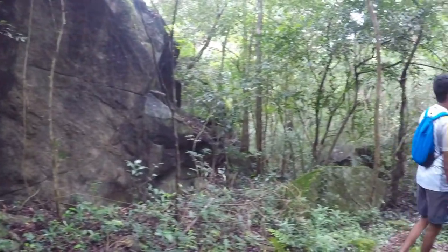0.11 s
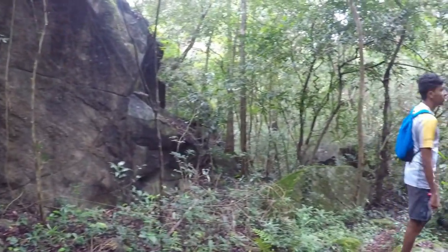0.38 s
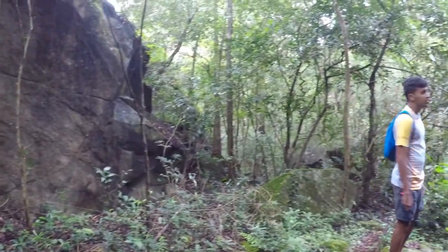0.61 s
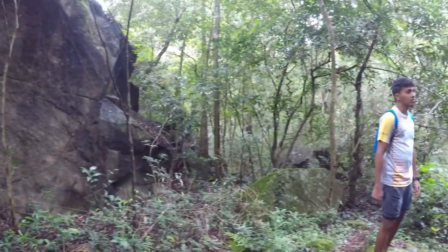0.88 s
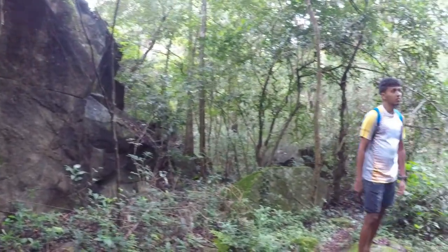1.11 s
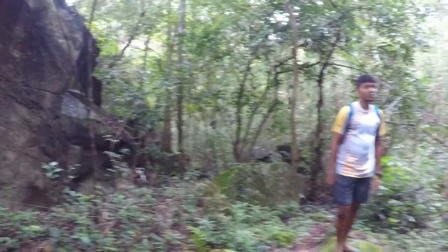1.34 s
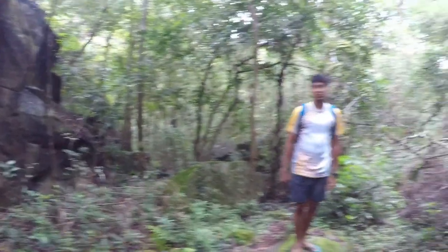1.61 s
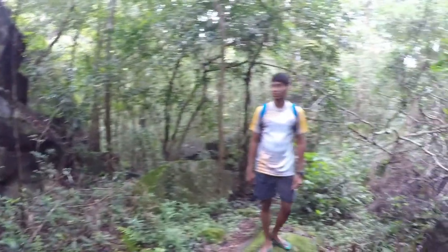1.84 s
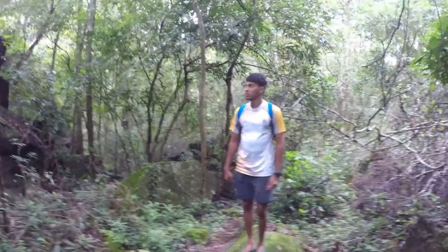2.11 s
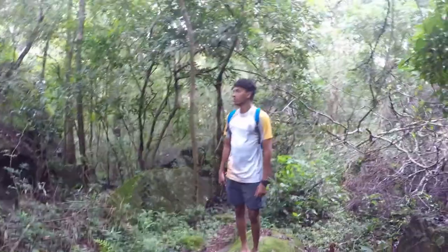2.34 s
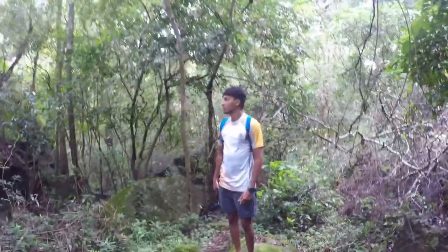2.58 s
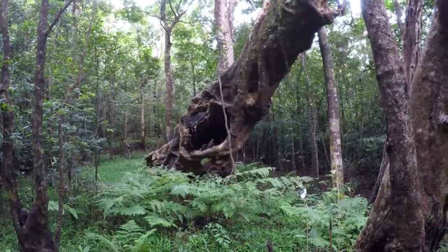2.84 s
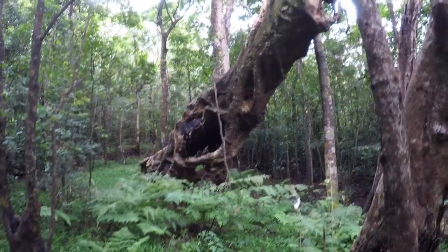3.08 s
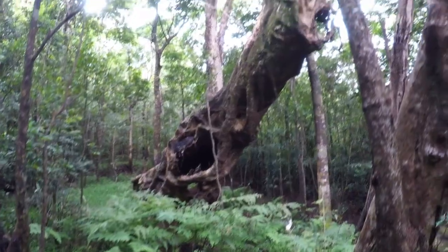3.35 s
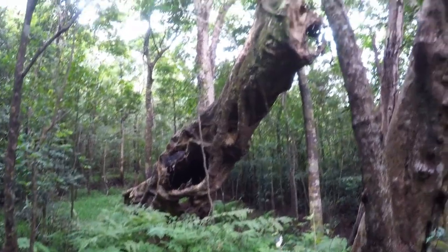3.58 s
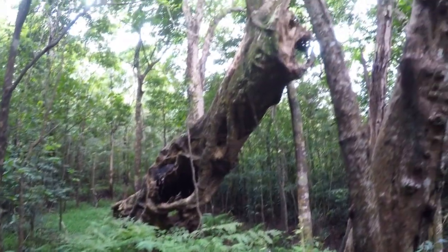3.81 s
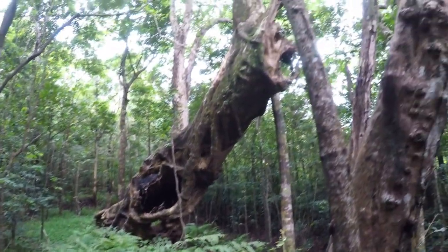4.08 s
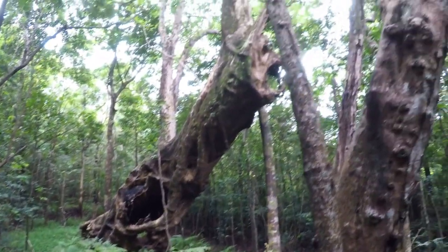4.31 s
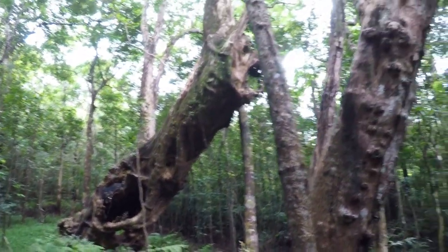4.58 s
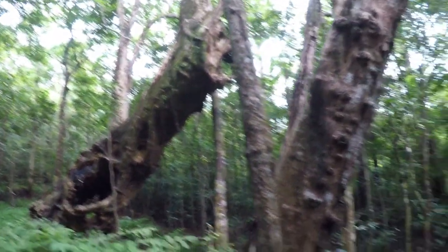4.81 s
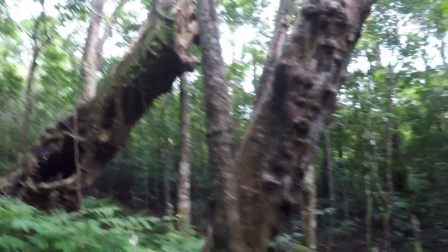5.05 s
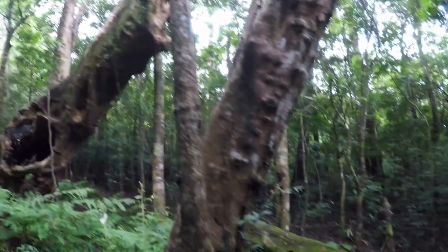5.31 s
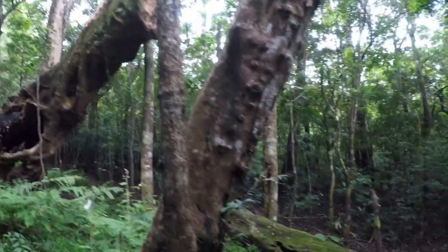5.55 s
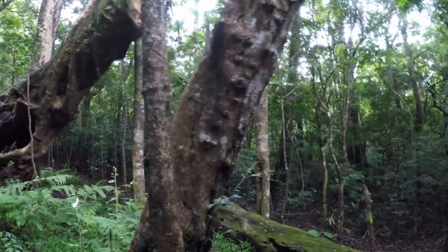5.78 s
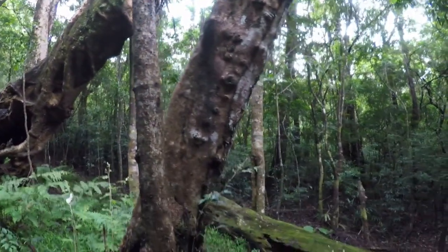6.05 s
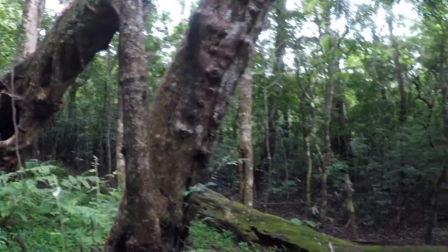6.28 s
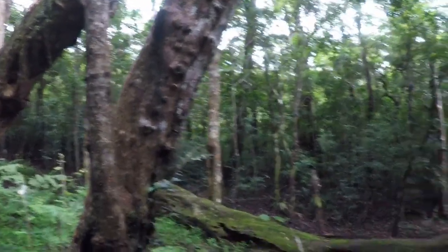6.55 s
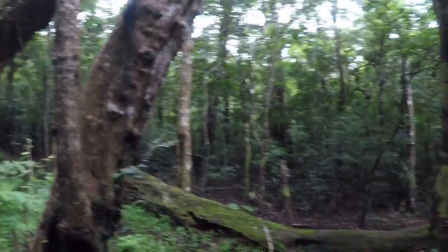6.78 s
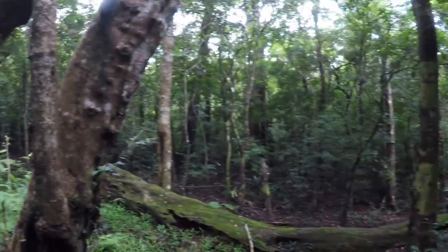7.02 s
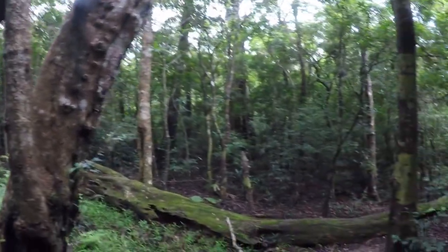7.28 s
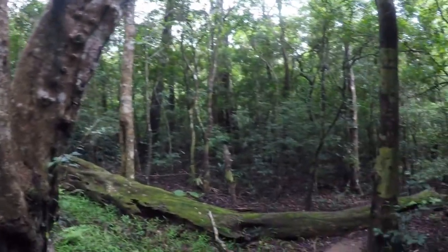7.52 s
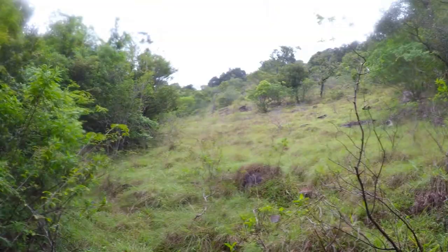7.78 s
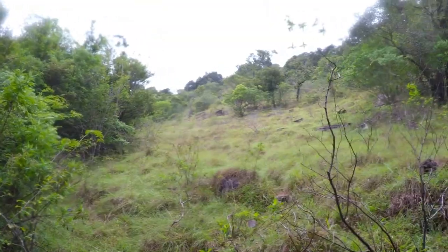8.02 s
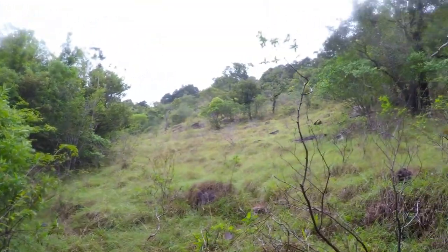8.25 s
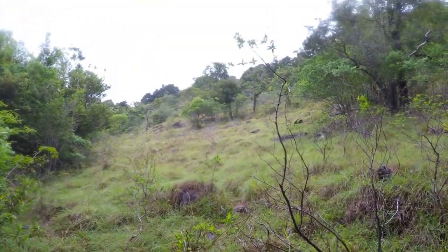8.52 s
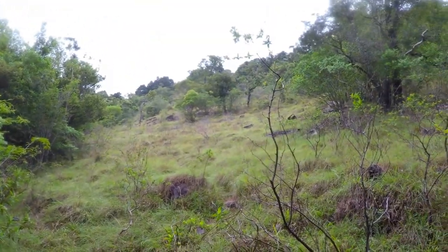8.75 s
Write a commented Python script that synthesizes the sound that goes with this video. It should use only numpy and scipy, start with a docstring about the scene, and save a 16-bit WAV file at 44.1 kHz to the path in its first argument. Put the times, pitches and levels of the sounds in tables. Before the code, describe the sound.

A hand-held camera on a forest walk: steady low rumble, leaf hiss and faint high insects, with a burst of heavy thumps and knocks from steps. A sudden cut brings near quiet, soft foliage and small gliding bird whistles echoing among trunks, then a cluster of bumps and scuffs. A last cut brings a low puff of wind and rattling knocks. Wide at first, nearly mono after cuts.

```python
"""Forest walk with a small camera

Three shots of a forest walk are cut together. Breeze and steps shake a hand-held camera's housing: filtered noise
rumbles near 160 Hz, and jolts and scuffs ring its resonances as thumps and knocks. Leaves, insects and short hissy
patches are shaped noise; far birds are gliding near-sines with echoes off the trunks.
The camera blends between two microphone ports (wide) and a single one (mono)."""
import sys
import numpy as np
from scipy import signal
from scipy.fft import rfft, irfft
from scipy.io import wavfile

SR = 44100
rng = np.random.default_rng(int(sys.argv[2]) if len(sys.argv) > 2 else 0)


def wav_out(sig):
    """Save sig, one row per channel (or a flat mono array), as 16-bit PCM at SR to the path in sys.argv[1]."""
    wavfile.write(sys.argv[1], SR, np.round(np.clip(np.atleast_2d(sig).T, -1, 1) * 32767).astype(np.int16))


def volts(x):
    """Linear amplitude factor 10**(x/20) for a level x in dB, scalar or array-like."""
    e = np.asarray(x, float) / 20
    return 10 ** e


N = 391608

# Moments where one shot cuts to the next, in seconds.
CUT_TIMES = [2.631, 7.801]

# Air pushing on the ports. Each row: frequency in Hz, relative level in dB per Hz.
WIND_COLOUR = [(15, -7), (40, 6.5), (100, 2.5), (160, -10), (300, -13)]
# Shaking of the housing, one list per shot. Each row: frequency in Hz, relative level in dB per Hz.
RUMBLE_COLOURS = [
    [(95, -54), (110, -20), (145, -1), (170, 0.5), (280, -14), (600, -44)],
    [(95, -44), (115, -28), (145, 1), (180, -2.5), (300, -13), (600, -40)],
    [(80, -9), (150, 3), (250, 2.5), (400, -15.5), (600, -24)],
]
# Hiss of the leaves, one list per shot. Each row: frequency in Hz, relative level in dB per Hz.
LEAF_COLOURS = [
    [(210, -46), (350, -9), (650, -11.5), (1550, -9), (2100, -13), (3660, -14), (4090, -17.5), (5360, -23),
     (7710, -26.5), (15500, -53)],
    [(210, -36), (350, -4.5), (1030, -12.5), (1130, -11.5), (2070, -14), (2350, -16.5), (9630, -26),
     (15500, -38)],
    [(210, -38), (350, 2), (619, -8.5), (2170, -14), (3030, -22), (4290, -19), (10100, -22), (15500, -47)],
]
# Swells, one list per shot. Each row: time in seconds, wind on the port in dB, housing rumble in dB,
# body of the leaf hiss in dB.
BREEZE_SWELLS = [
    [(0, -40, -31.5, -52.5), (1.41, -55, -29, -51.5), (2.14, -43.5, -30.5, -50.5), (2.628, -44, -28, -42)],
    [(2.636, -45, -49.5, -55), (3.93, -59, -48.5, -54.5), (6.11, -77, -48.5, -57), (6.59, -65, -38, -54.5),
     (6.83, -76, -49, -58), (7.797, -75, -44, -53)],
    [(7.806, -34, -55, -54), (8.068, -38.5, -38, -47), (8.88, -51, -43, -50)],
]
# How far apart the two ports hear noise. Each row: frequency in Hz, side over mid in dB before the port blend.
PORT_DIFFERENCE = [(60, -22), (140, -22), (290, -7.5), (640, 7), (1400, 2), (2500, 0.5), (3600, -8.5),
                   (5200, -0.5), (15000, -1)]

# Starting point for the treble of the hiss: one level in dB per shot.
TREBLE_LEVELS = [-53, -64, -59.5]
TREBLE_FOLLOWS = 0.65   # share of the leaf body's swing in dB
DULL_DB, BRIGHTEN_S = -21, 0.23   # after a cut the treble is heard this far down, then returns (time constant)

CHORUS_DB = -57   # insects near 5.2 kHz, middle level
# Short hissy patches, narrow or broad: some insects, brushed leaves, scuffs and hisses of unknown source.
# Each row: start in seconds, length in seconds, centre in Hz, width in Hz, level in dB.
HISSY_PATCHES = [(.26, 0.085, 7550, 400, -58), (0.91, 0.19, 5130, 600, -52),
                 (1.235, 0.062, 7660, 400, -52.5), (2.182, 0.13, 1990, 795, -45),
                 (2.236, 0.081, 7600, 400, -51), (2.417, 0.81, 2000, 780, -40),
                 (2.76, 0.24, 3570, 1600, -56.5), (3.36, 0.09, 5370, 300, -64),
                 (4.37, 0.045, 5500, 2000, -61), (8.292, 0.018, 4800, 1200, -38),
                 (8.407, .08, 5450, 900, -58)]

# Gliding bird whistles. Each row: start in seconds, length in seconds, first pitch in Hz, last pitch in Hz,
# base level in dB.
BIRD_WHISTLES = [(0.988, 0.24, 3860, 3296, -56.5), (3.255, .07, 2085, 1870, -61),
                 (3.657, 0.048, 2550, 2130, -57), (3.708, 0.12, 2050, 1270, -46),
                 (4.058, 0.23, 1700, 1770, -69), (4.209, 0.066, 1850, 2020, -65),
                 (4.304, 0.098, 1850, 1515, -61.5), (4.778, .09, 1207, 1053, -64),
                 (4.828, .28, 2580, 1963, -58), (5.08, .17, 5630, 4300, -66), (5.27, .2, 3920, 2920, -66.5),
                 (6.185, .1, 1880, 1890, -61.5), (6.292, 0.1, 1210, 1037, -59),
                 (6.512, 0.139, 1250, 1325, -51), (7.165, 0.098, 1875, 1595, -56),
                 (7.617, 0.079, 3270, 3680, -65), (7.653, 0.046, 1874, 1960, -53.5),
                 (7.658, 0.064, 2790, 2930, -53)]
GLIDE_EASE = 1.5   # over 1: the glide is fast at first and settles on the last pitch
LOUDER_DB_PER_OCTAVE = 10   # gain as a whistle sinks in pitch
# Arched bird calls. Each row: start in seconds, length in seconds, top pitch in Hz, base level in dB.
BIRD_HOOTS = [(3.613, .2, 1506, -51), (4.898, 0.22, 1479, -52)]
HOOT_START, HOOT_END = 0.85, 0.83   # pitch as a share of the top pitch
HOOT_TOP_AT, HOOT_LOW_AT = 0.218, 0.62   # moments as shares of the call's length
CALL_ATTACK_S, CALL_HOLD, CALL_FADE_DB = 0.0072, 0.59, -8   # hold as share of the length; fade by the end
FOREST_T60_S, FOREST_DB = 0.86, 0   # time for the echoes to fall 60 dB; their level against the call

# Jolts of the camera. Each row: time in seconds, then the relative strengths in dB of knock, thump,
# hollow part and crack.
CAMERA_JOLTS = [(1.3741, -24.5, -5.5, -20.5, -29), (1.4607, -27.5, -27, -23, -38),
                (1.4729, -37, -14, -18.5, -38), (1.4835, -33, -17, -35, -39),
                (1.5658, -24.5, -4.5, -7.5, -23.5), (1.5705, -29, -8.5, -36, -46),
                (1.644, -23, -7, -14.5, -26), (1.669, -17, 0, -10, -14.5), (2.5712, -28, -1, -16.5, -25),
                (2.5973, -46, 1.5, -46, -40), (3.6236, -41.5, -23.5, -33, -31),
                (5.2033, -47.5, -60, -51, -40), (5.3309, -52, -25, -37.5, -39),
                (6.0623, -50, -21, -29.5, -69), (6.095, -37.5, -9.5, -20.5, -50),
                (6.2732, -57, -21, -37, -72), (6.371, -28, -7.5, -14, -34), (6.395, -31.5, -11, -31, -32),
                (6.408, -22.5, -27, -34, -28), (6.4146, -20, -3, -10, -13.5), (6.4348, -33, -6.5, -23, -48),
                (6.4541, -29, -7, -11, -21), (6.4616, -22.5, -3.5, -34, -17.5),
                (6.4817, -33.5, -19, -40, -39), (6.5156, -46, -15.5, -19, -37),
                (6.692, -27.5, -20.5, -48, -26.5), (6.761, -31, -11, -14, -33),
                (7.236, -39, -13.5, -53, -60), (7.8202, -47, -21, -33, -65), (7.868, -42, -16, -24, -61),
                (7.939, -57, -26, -26, -34), (7.9757, -36, -15.5, -17, -25.5), (7.9913, -30, -11, -19, -36),
                (8.143, -51, -23, -31, -50), (8.189, -51, -10, -21.5, -45), (8.2352, -45, -23, -28, -44),
                (8.278, -55, -35, -27, -45), (8.2887, -55, -27, -13.5, -40), (8.3003, -22, -12, 0, -21),
                (8.3061, -48, -35, -11, -40), (8.4282, -35, -14, -20, -33)]
CONTACT_S, CONTACT_SPREAD_DB = 0.0035, 2.5   # time scale of a jolt's chatter, and how much that varies
# Hand and strap scuffing the housing. Each row: start in seconds, length in seconds, relative strength in dB.
HOUSING_SCUFFS = [(2.183, 0.083, -49.5), (2.41, 0.26, -58), (6.444, 0.062, -37), (6.482, 0.081, -42.5),
                  (6.582, 0.028, -40), (6.545, 0.09, -50), (6.685, 0.031, -41), (6.756, 0.06, -37.5),
                  (7.226, 0.038, -45.5), (7.4, 0.059, -55), (7.784, 0.016, -33.5), (7.852, 0.027, -48),
                  (7.925, 0.093, -48.5), (8.133, 0.056, -49.5), (8.26, 0.019, -64), (8.405, 0.12, -47.5)]
# Resonances of the housing, in lists for thump, hollow part, knock and crack. Each row: frequency in Hz,
# relative level in dB, time to fall 60 dB in seconds.
HOUSING_MODES = [
    [(165.3, 2.5, 0.069), (210, -2, 0.032), (290, -31, 0.026)],
    [(426, 6.5, 0.0067), (671, -26.5, 0.14), (820, -6, 0.029)],
    [(1215, 4.5, 0.013), (1664, -6, 0.025), (1960, 7, 0.0072), (2143, -6, 0.012), (2585, -7.5, 0.008),
     (3080, -11.5, 0.02)],
    [(3880, -2.5, 0.0032), (5500, -3.5, 0.003), (6930, -15, 0.012), (8840, -17.5, 0.0034)],
]
# A yielding contact passes little higher pitch: one limit in Hz for each of those four parts.
CONTACT_LIMITS = [900, 1500, 4300, 13000]
# Difference between the ports through the shell. Each row: frequency in Hz, relative side level in dB.
SHELL_DIFFERENCE = [(130, -29), (240, -4), (460, 7), (720, 12.5), (1400, 6), (2400, -1), (3400, 5),
                    (7000, -3)]
# Low cut on the jolts and scuffs: one frequency in Hz per shot.
HOUSING_LOW_CUTS = [141.4, 155, 104]
HOUSING_TOP_HZ = 11400

MONO_DB, WIDE_DB = -34.5, 0.5   # side gain just after a cut, and with both ports open
CREEP_DB_PER_S, MONO_S, WIDEN_S = 6.5, 2.2, 0.73   # after a cut: nearly mono, then the second port fades in


def shots():
    """Sample ranges between the cuts."""
    edges = [0] + [round(s * SR) for s in CUT_TIMES] + [N]
    return [slice(a, b) for a, b in zip(edges, edges[1:])]


def by_shot(values):
    """One value per shot, at every sample."""
    return np.repeat(values, [part.stop - part.start for part in shots()])


def since_cut():
    """Seconds since the last cut; the first shot counts as running for 60 s already."""
    return np.arange(N) / SR - by_shot([-60] + list(CUT_TIMES))


def in_time(*tables):
    """Columns of the joined tables at every sample."""
    seconds, *columns = np.transpose(np.concatenate(tables))
    return [np.interp(np.arange(N) / SR, seconds, column) for column in columns]


def at_hz(points, hz):
    """Read a spectrum on a log-frequency axis."""
    table_hz, table_db = np.transpose(points)
    return np.interp(np.log(hz), np.log(table_hz), table_db)


def rms_one(x):
    """Scale to unit power."""
    return x / np.sqrt(np.mean(x ** 2) + 1e-20)


def filtered(x, order, hz, kind="low"):
    """Pass x through a Butterworth filter."""
    return signal.sosfilt(signal.butter(order, hz, kind, fs=SR, output="sos"), x)


def drift(rate):
    """Random wandering of spread 1, smoothed at a rate in Hz and drawn at every 40th sample."""
    r = np.exp(-80 * np.pi * rate / SR)
    draws = rng.standard_normal(N // 40 + 2002)
    slow = signal.lfilter([1], [1, -2 * r, r * r], draws)[2000:]   # skip the filter's start
    return np.interp(np.arange(N) / 40, np.arange(len(slow)), rms_one(slow))


def arch(s, length, skew=1):
    """Smooth rise and fall of loudness; skew below 1 puts the peak early."""
    course = np.clip((np.arange(N) / SR - s) / length, 0, 1)
    return np.sqrt(np.sin(np.pi * course ** skew) + 1e-12)


def coloured(x, points):
    """Give mid and side the colour of a spectrum; the side follows the port difference; mid rms 1."""
    hz = np.maximum(np.fft.rfftfreq(x.shape[1], 1 / SR), 1)
    inside = (hz >= points[0][0]) & (hz <= points[-1][0])
    gain = volts(at_hz(points, hz)) * inside * volts([0 * hz, at_hz(PORT_DIFFERENCE, hz)])
    out = irfft(rfft(x) * gain, x.shape[1])
    return out / np.sqrt(np.mean(out[0] ** 2))


def port_wind(db):
    """Gusty air pressure on the ports: low noise, strongest near 40 Hz, whose level wanders."""
    return volts(db + 2.0 * drift(11.0)) * coloured(rng.standard_normal((2, N)), WIND_COLOUR)


def housing_rumble(db):
    """Lumpy shaking: noise of uneven strength, shaped by the housing's low resonance."""
    lumps = volts(0.97 * drift(25.4) + 0.58 * drift(7.7))
    shake = rng.standard_normal((2, N)) * lumps
    rumble = [coloured(shake[:, part], colour) for part, colour in zip(shots(), RUMBLE_COLOURS)]
    return volts(db) * np.hstack(rumble)


def treble_db(leaf_db):
    """Treble of the hiss follows the body in part; the hiss sounds dull just after each cut."""
    swing = leaf_db - by_shot([leaf_db[part].mean() for part in shots()])
    dulled = DULL_DB * np.exp(-since_cut() / BRIGHTEN_S)
    return by_shot(TREBLE_LEVELS) + TREBLE_FOLLOWS * swing + dulled


def leaf_hiss(body_db, top_db):
    """Far foliage as noise; body and treble swell apart, the bands between follow both."""
    noise, out = rng.standard_normal((2, N)), np.zeros((2, N))
    for part, colour in zip(shots(), LEAF_COLOURS):
        hiss = coloured(noise[:, part], colour)
        body = rms_one(filtered(hiss, 2, 4500))
        treble = rms_one(filtered(hiss, 4, 5500, "high"))
        out[:, part] = volts(body_db[part]) * body + volts(top_db[part]) * treble
    return out * volts(0.58 * drift(1.4))


def chorus_and_hisses():
    """Bands of noise: a wavering insect chorus in the first shot and short hissy patches of various origin."""
    t, noise, shot = np.arange(N) / SR, rng.standard_normal((2, N)), by_shot(range(3))

    def band(hz, width):
        return rms_one(filtered(noise, 2, [hz - width / 2, hz + width / 2], "band"))

    flicker = volts(2.5 * drift(25.0))
    out = volts(CHORUS_DB + 2.0 * drift(1.4)) * flicker * (t < CUT_TIMES[0]) * band(5230, 600)
    for s, length, hz, width, db in HISSY_PATCHES:
        same_shot = shot == shot[int(s * SR)]   # no patch outlasts its shot
        out += volts(db) * same_shot * arch(s, length) * band(hz, width)
    return out


def call(s, length, db, contour, sinking_db=0):
    """A near-sine with unsteady breath; contour gives the pitch in Hz over the call's course 0-1."""
    t = np.arange(N) / SR - s
    course = np.clip(t / length, 0, 1)
    pitch = contour(course)
    edges = np.clip(np.minimum(t, length - t) / CALL_ATTACK_S + 0.5, 0, 1) ** 2
    fade_db = np.interp(course, [CALL_HOLD, 1], [0, CALL_FADE_DB])
    pitch_db = sinking_db * np.log2(contour(np.ones(1)) / pitch)   # 0 at the last pitch
    level = edges * volts(db + fade_db + pitch_db + 3.26 * drift(68.0))
    wobbly_pitch = pitch * (1 + 0.014 * drift(50.7))
    return np.sqrt(2) * level * np.sin(2 * np.pi * np.cumsum(wobbly_pitch) / SR)


def whistles():
    """Bird whistles that glide from a first to a last pitch."""
    out = np.zeros(N)
    for s, length, first, last, db in BIRD_WHISTLES:
        def glide(u):
            return last * (first / last) ** ((1 - u) ** GLIDE_EASE)
        out += call(s, length, db, glide, LOUDER_DB_PER_OCTAVE)
    return out


def hoots():
    """Bird calls whose pitch rises to a top, then sinks and stays low."""
    out = np.zeros(N)
    for s, length, top, db in BIRD_HOOTS:
        def rise_and_fall(u):
            return top * np.interp(u, [0, HOOT_TOP_AT, HOOT_LOW_AT], [HOOT_START, 1, HOOT_END])
        out += call(s, length, db, rise_and_fall)
    return out


def birds():
    """Whistles and arched calls, blurred by echoes off the trunks: a fading tail of noise."""
    calls = whistles() + hoots()
    t = np.arange(SR) / SR
    echoes = rng.standard_normal((2, SR)) * volts(-60 * t / FOREST_T60_S) * (t > 0.008)
    echoes = volts(FOREST_DB) * echoes / np.sqrt(np.sum(echoes[0] ** 2))
    out = np.zeros((2, N))
    for part in shots():   # a cut ends the echoes
        direct = calls[part] * volts([[0], [-3.0]])
        echoed = signal.fftconvolve(calls[None, part], echoes, axes=1)
        out[:, part] = direct + echoed[:, :part.stop - part.start]
    return out


def jolt_strikes():
    """Each jolt: a soft shove for the thump, a tap for the hollow part, a chattering contact above."""
    size = 2000   # samples per jolt
    strikes, t = np.zeros((4, N + size)), np.arange(size) / SR
    chatter = rng.standard_normal((len(CAMERA_JOLTS), size))
    push = t ** 2 * np.exp(-t / 0.00074)
    push = push / push.sum()
    for (s, knock_db, thump_db, hollow_db, crack_db), noise in zip(CAMERA_JOLTS, chatter):
        start = round(s * SR)
        span = slice(start, start + size)
        thump, hollow, knock, crack = volts([thump_db, hollow_db, knock_db, crack_db])
        contact_s = CONTACT_S * volts(CONTACT_SPREAD_DB * noise[-1])   # the last draw varies the time
        contact = noise * (t + 1e-4) ** 1.59 * np.exp(-3 * t / contact_s)
        contact = contact / np.sqrt(np.sum(contact ** 2))
        strikes[0, span] += thump * push
        strikes[1, start + 40] -= 0.36 * hollow   # the tap
        strikes[1:3, span] += np.outer([0.5 * hollow, knock], contact)
        snap = contact * np.exp(-t / 0.003)   # the crack favours the first instants of contact
        strikes[3, span] += crack * snap / np.sqrt(np.sum(snap ** 2))
    return strikes[:, :N]


def rub_strikes(per_s):
    """Scuffs as stick-slip grains of uneven size, weighted per part of the housing."""
    level = sum(volts(db) * arch(s, length, skew=0.72) for s, length, db in HOUSING_SCUFFS)
    size_db = 2.5 * np.minimum(rng.exponential(1, N), 5) + 3.0 * drift(40.0)
    sizes = volts(size_db) * rng.choice([-1, 1], N)
    slips = rng.random(N) < per_s / SR
    grains = rms_one(sizes * slips) * level
    return volts([-28, -26.0, -21.5, -20.5])[:, None] * grains


def housing(strikes):
    """Strikes (part, sample) ring the modes; the ports sit apart on the shell, so the side is turned in phase."""
    out = np.zeros((2, N))
    for force, modes, soft_hz in zip(strikes, HOUSING_MODES, CONTACT_LIMITS):
        force = filtered(force + 1e-18, 2, soft_hz)   # the tiny offset keeps the filter off exact silence
        for hz, db, t60 in modes:
            r, w = volts(-60 / (t60 * SR)), 2 * np.pi * hz / SR
            side_gain = volts(at_hz(SHELL_DIFFERENCE, hz))
            for part in shots():   # a cut ends the ringing
                ring = volts(db) * signal.lfilter([1], [1, -r * np.exp(1j * w)], force[part] + 1e-18)
                out[0, part] += ring.imag
                out[1, part] += side_gain * (0.62 * ring.real - 0.43 * ring.imag)
    for part, hz in zip(shots(), HOUSING_LOW_CUTS):
        out[:, part] = filtered(out[:, part], 8, hz, "high")
    return filtered(out, 3, HOUSING_TOP_HZ)


def port_blend_db():
    """Side gain: nearly mono after a cut, wide again some seconds later if the shot lasts."""
    crept_db = MONO_DB + CREEP_DB_PER_S * MONO_S
    return np.interp(since_cut(), [0, MONO_S, MONO_S + WIDEN_S], [MONO_DB, crept_db, WIDE_DB])


def scene():
    """All sources as mid and side, then the port blend turns them into left and right."""
    wind_db, rumble_db, leaf_db = in_time(*BREEZE_SWELLS)
    breeze = port_wind(wind_db) + housing_rumble(rumble_db) + leaf_hiss(leaf_db, treble_db(leaf_db))
    mid, side = breeze + chorus_and_hisses() + birds()
    knocks, opposed = housing(jolt_strikes() + rub_strikes(per_s=1500.0))
    blend_db = port_blend_db()
    one_port = 1 - volts(blend_db - WIDE_DB)
    mid = mid + knocks + 0.48 * one_port * opposed   # what cancels between two ports is heard by one alone
    side = side + opposed
    side = volts(blend_db) * (side - 0.066 * mid)   # the right port is a little louder
    return np.array([mid + side, mid - side])


def band_limit(x):
    """A steep low-pass at the top of the band."""
    return signal.sosfilt(signal.butter(12, 16340, fs=SR, output="sos"), x)


def record(dry):
    """Loud peaks are rounded, then a steep filter cuts the top."""
    rounded = 1.0 * np.tanh(dry / 0.95)
    top_cut = signal.cheby2(10, 50, 15600, fs=SR, output="sos")
    mix = signal.sosfilt(top_cut, rounded)
    return band_limit(mix)


dry = scene()
out = record(dry)
wav_out(out)
```